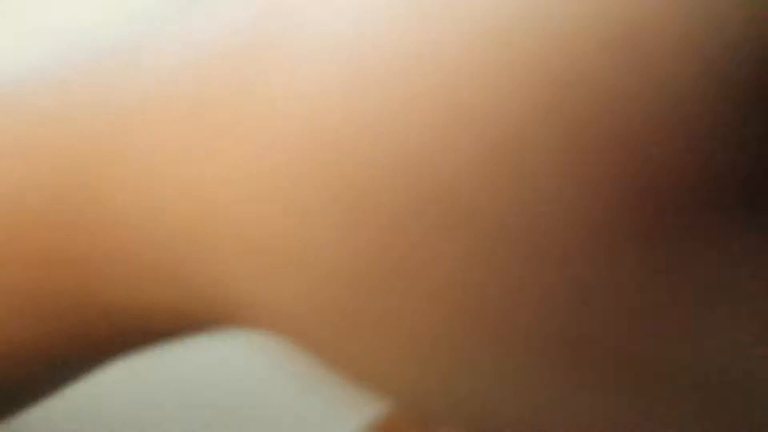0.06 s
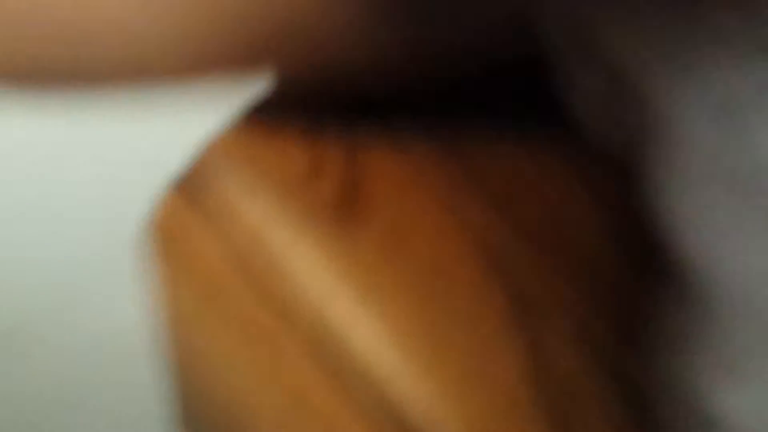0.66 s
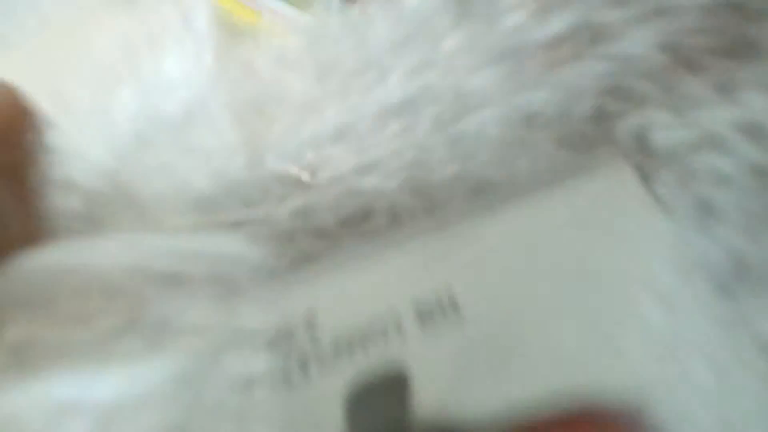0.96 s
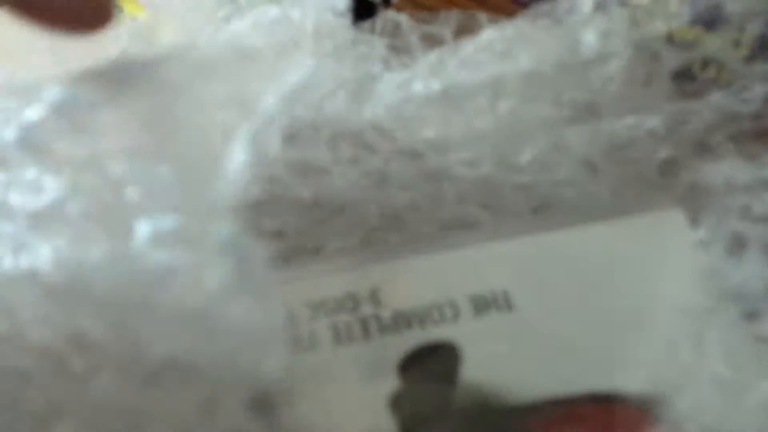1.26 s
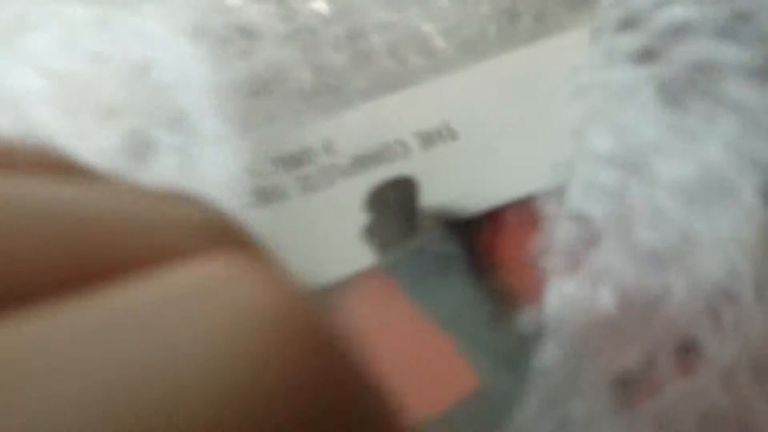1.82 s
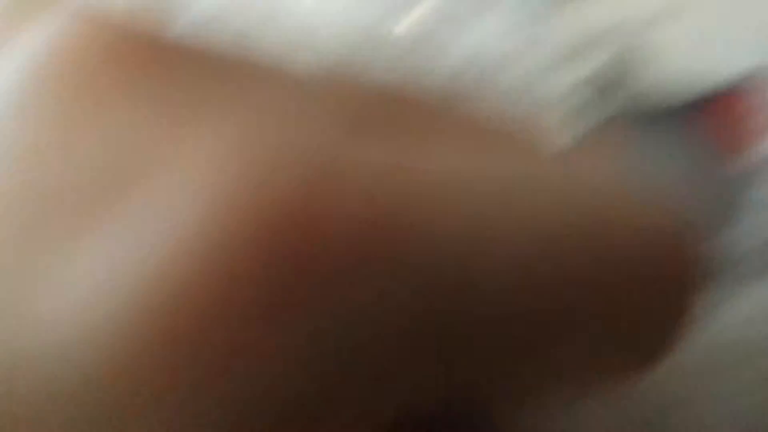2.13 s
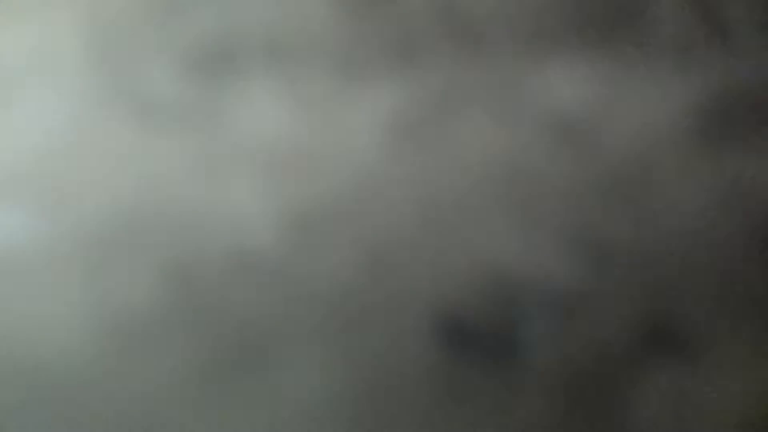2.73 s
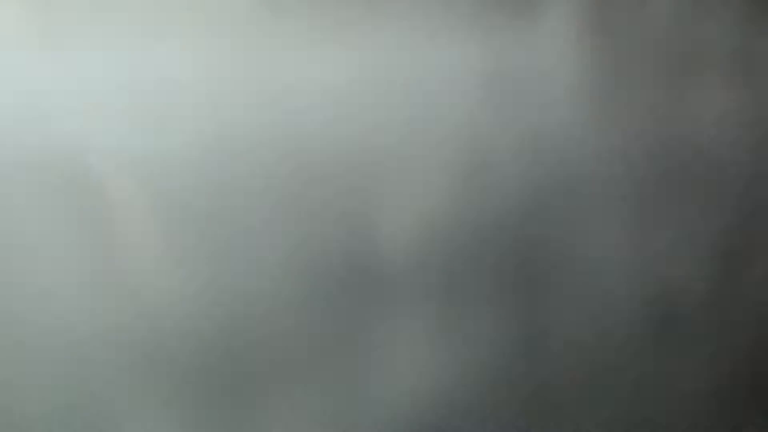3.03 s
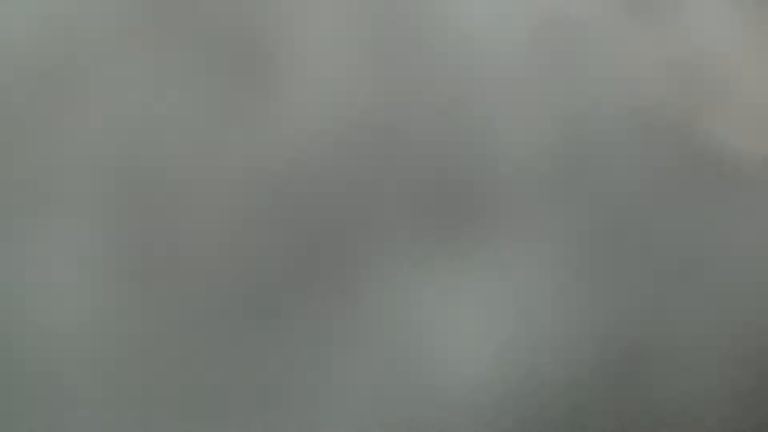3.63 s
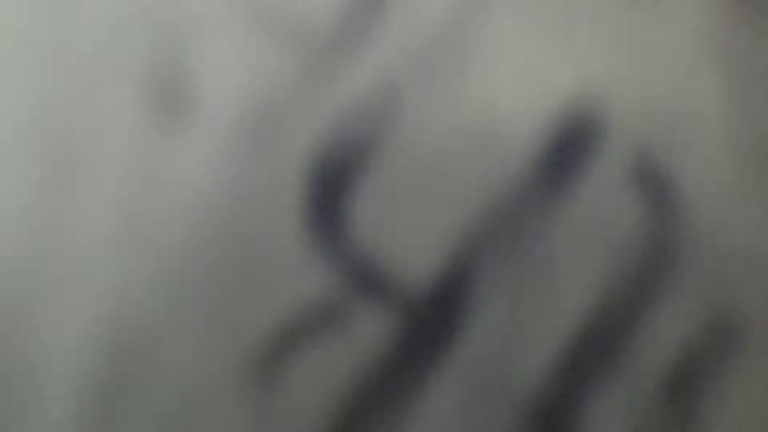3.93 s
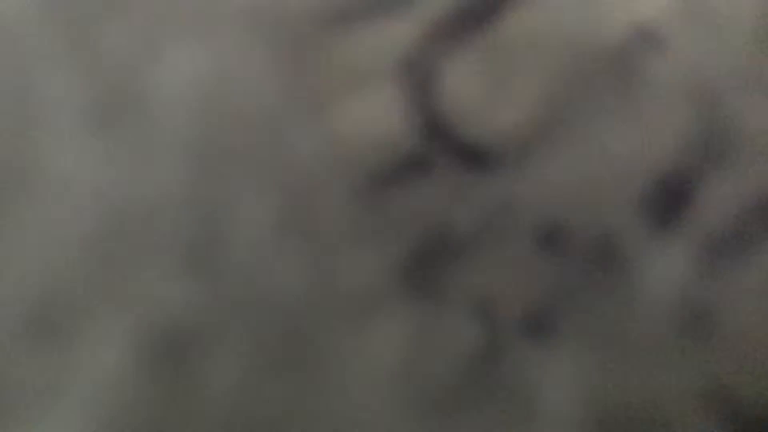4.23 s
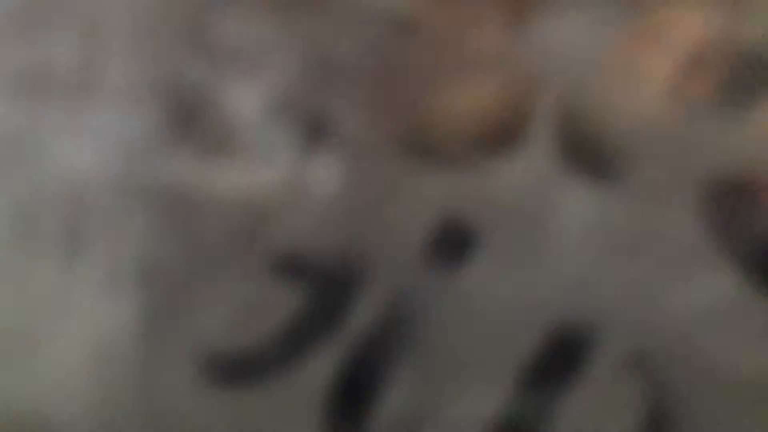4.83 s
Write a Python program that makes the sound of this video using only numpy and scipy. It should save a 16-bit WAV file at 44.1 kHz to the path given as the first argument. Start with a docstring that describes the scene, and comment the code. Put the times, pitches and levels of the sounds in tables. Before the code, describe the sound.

Plastic bubble wrap crackles and rustles very close as it is squeezed and tugged off a box indoors. A dense first burst of crinkling comes with low thumps and rumble from fingers on the microphone. After a short lull, irregular crinkles and crisp snaps carry on to the end, including a short finger squeak and a hiss of clinging plastic separating. The room sounds small and fairly dry.

```python
"""Bubble wrap pulled open by hand, right next to a handheld microphone in a small furnished room.
The film crinkles in a spray of tiny buckles; single creases snap and ring their air cells.
Fingers rub and knock on the housing. The wrap slides off its box, squeaks under a finger, peels apart.
Each of the two microphone ports colours the crackle with its own resonances."""
import sys
import numpy as np
from scipy import signal
from scipy.fft import rfft, irfft
from scipy.io import wavfile
from scipy.ndimage import uniform_filter1d

SR = 44100
rng = np.random.default_rng(int(sys.argv[2]) if len(sys.argv) > 2 else 0)


def generate_wav(signal):
    """Clip the signal to [-1, 1] and save it as 16-bit WAV at the path in sys.argv[1]."""
    frames = np.transpose(np.atleast_2d(signal))
    scaled = np.clip(frames, -1, 1) * 32767
    pcm = np.round(scaled).astype(np.int16)
    wavfile.write(sys.argv[1], SR, pcm)


N = 223675

# hands squeezing the film: start_s, rise_s, hold_s, level_db, body_re_level_db, pan_db (left - right)
FILM_SQUEEZES = [(0.0, 0.0033, 0.28, -46, 0.5, 17), (0.152, 0.098, 0.092, -21.5, -9.5, 6),
                 (0.357, 0.025, .03, -23.5, -10.5, 4.5), (0.454, 0.043, .12, -25.5, -10.5, 7),
                 (0.641, 0.027, 0.059, -26.5, -9.5, 5), (0.765, 0.049, 0.053, -22, -18.5, 5),
                 (0.892, 0.0084, 0.052, -38.5, -9.5, 2), (1.563, 0.076, 0.1, -40.5, -12.5, 0),
                 (1.885, 0.014, 0.23, -37, -19, 2), (1.967, 0.047, 0.038, -25.5, -37, 0.5),
                 (2.07, 0.13, 0.13, -30, -19, -2.5), (2.348, 0.0069, .008, -34.5, -5.5, -3),
                 (2.401, 0.0077, 0.14, -34.5, -9, 3), (2.558, 0.026, 0.029, -31.5, -10.5, 0),
                 (2.687, 0.041, 0.051, -31.5, -15.5, 2.5), (2.856, 0.087, 0.023, -33, -6, 1),
                 (2.972, .006, 0.021, -34.5, 3.5, 7), (3.039, 0.0079, .02, -36, 1, 5),
                 (3.128, 0.011, 0.005, -33.5, 1, 1), (3.27, 0.003, 0.073, -21.5, -17.5, 0.5),
                 (3.453, 0.015, .04, -37, -26, -4), (3.533, .006, 0.042, -19.5, -13.5, -1),
                 (3.593, 0.052, 0.11, -26, -17, -2), (3.831, 0.053, 0.14, -34.5, -14, -3.5),
                 (4.191, 0.0065, 0.012, -32, -10, -3.5), (4.352, 0.13, 0.02, -37, -9.5, -3.5),
                 (4.54, 0.061, 0.014, -35, -14.5, -5.5), (4.655, 0.009, 0.12, -38.5, -16.5, -6),
                 (4.794, 0.025, 0.22, -32.5, -14.5, -3.5), (4.863, 0.15, .10, -25, -17.5, -6.5)]
# loose film stirring: time_s, level_db
LOOSE_RUSTLE = [(0, -36.5), (0.95, -43), (1.0, -51), (1.05, -44.5), (1.27, -48), (1.36, -66), (1.56, -52.5),
                (2.0, -37.5), (3.1, -42), (3.45, -42.5), (3.82, -53.5), (4.1, -40.5), (4.33, -43.5),
                (5.07, -54)]
# big creases snapping: start_s, crack_db, cell_db, cell_hz, pan_db
BIG_CREASES = [(0.0236, -19, -46, 3420, 11), (0.069, -48, -11, 860, 24), (0.1267, -24.5, -30, 2000, 3),
               (0.2358, -12, -19, 3140, 14), (0.417, -15, -52, 3130, -12), (0.4581, -6.5, -11.5, 2040, 10),
               (0.486, -15.5, -30, 2500, 7), (0.527, -16, -15.5, 3100, 10), (0.572, -17, -20, 2300, 17),
               (0.6049, -19, -19.5, 2080, 19), (0.6393, -12.5, -21, 3200, 3.5),
               (0.6648, -14.5, -17, 2000, 7), (0.676, -19, -15, 1640, 15), (0.7467, -11, -7, 2520, 10),
               (0.7816, -18.5, -17, 2400, 21), (0.785, -24, -6.5, 2680, 11), (0.7956, -26, -15, 2200, 15),
               (0.8097, -17, -13.5, 1760, -10), (0.8117, -9.5, -9, 2000, 12), (0.832, -14, -23, 3100, 18),
               (0.8341, -17, -16, 2700, 5), (0.8841, -15, -43, 3200, 27), (0.9062, -11.5, -12, 2220, 11),
               (0.9101, -12.5, -13.5, 1810, 18), (1.276, -30.5, -51, 2260, 7.5), (1.961, -26, -21, 2700, 3),
               (2.0293, -15.5, -19, 3200, 4), (2.039, -19, -39, 2700, -11), (2.1516, -19.5, -45, 2900, 0),
               (2.1814, -18.5, -35, 2620, 0), (2.2201, -16, -52, 3200, 19), (2.2906, -15.5, -40, 2700, 3),
               (2.3235, -9, -10, 2300, -6), (2.3244, -10.5, -15, 1070, 6), (2.3711, -15.5, -18, 2200, -5),
               (2.478, -44, -19, 2140, 8), (2.5362, -26, -19, 1440, 34), (2.689, -21.5, -25.5, 2800, 12),
               (2.76, -21.5, -21, 2900, 4), (2.771, -23, -22, 1650, 32), (2.9556, -35, -13.5, 2350, 11),
               (3.0596, -25, -17.5, 1840, 0), (3.129, -22, -13.5, 2380, 1), (3.2003, -25, -46, 3300, -1),
               (3.2395, -14.5, -13, 2780, 14), (3.2687, -14.5, -16, 2240, 13), (3.2777, -25, -10, 2850, 3),
               (3.3012, -34, -17.5, 3000, 26), (3.3462, -15, -13, 2210, 7), (3.392, -24, -43, 3500, -20),
               (3.461, -23.5, -34, 3080, -2), (3.4744, -15, -22.5, 3100, -18), (3.4838, -23, -23, 2850, 9),
               (3.5081, -12.5, -20.5, 2690, -3), (3.5214, -23, -12.5, 1980, 6),
               (3.5417, -11.5, -11.5, 2730, 3), (3.6001, -20, -24, 2200, 13), (3.7309, -18, -26, 2770, 5),
               (3.9898, -21.5, -51, 2800, 31), (4.0884, -28.5, -34, 2320, -7), (4.1985, -19, -22, 3240, -9),
               (4.695, -20.5, -28.5, 2920, -4), (4.775, -30, -28.5, 2480, 3)]
# hand sliding on the housing: start_s, rise_s, hold_s, level_db, pan_db
HOUSING_RUBS = [(0.036, 0.038, .11, -31, -4), (0.153, 0.13, 0.095, -31, 14), (0.416, 0.013, 0.074, -45, 20),
                (0.704, 0.075, 0.05, -34, 12.5), (0.892, .01, 0.013, -36, 5), (1.88, 0.0075, 0.16, -56, 0),
                (2.43, 0.03, 0.095, -46.5, 18), (2.747, .01, 0.12, -54, 14), (2.954, .04, .18, -45, 11),
                (3.28, .07, .015, -41, 3), (3.53, 0.022, 0.023, -40, 3), (3.732, 0.019, 0.15, -52, -23),
                (4.574, 0.027, .01, -55, -14), (4.807, 0.019, 0.019, -48, -15)]
# soft knocks on the housing: start_s, level_db, pitch_hz
HOUSING_KNOCKS = [(0.042, -11.5, 65), (0.0689, -2.5, 82.6), (0.214, -11, 206), (0.339, -8.5, 162),
                  (0.701, -11, 186), (0.713, -11.5, 183), (0.744, -1, 307), (0.75, -8, 128.6),
                  (0.782, -9, 169), (0.810, -15, 171), (0.909, -16, 219), (1.199, -26, 507),
                  (2.21, -25, 426), (2.229, -19, 437), (2.534, -21, 378), (2.981, -5.5, 169),
                  (3.004, -10.5, 220), (3.050, -15, 132), (3.064, -10.5, 156), (3.136, -18, 139),
                  (3.958, -25.5, 303), (4.199, -15, 310), (4.249, -26.5, 285), (4.393, -24, 370),
                  (4.768, -13.5, 332)]
# wrap sliding off the box: time_s, level_db
SLIDE_CURVE = [(.92, -78), (.97, -46), (1.00, -55), (1.05, -45), (1.20, -60), (1.30, -64), (1.34, -82)]
# finger squeaking on the film: time_s, pitch_hz, level_db
SQUEAK_CURVE = [(1.965, 800, -86), (1.980, 926, -52), (2.000, 1020, -38), (2.014, 1040, -40),
                (2.030, 1150, -83)]
# clinging layers peeling apart: time_s, level_db
PEEL_CURVE = [(3.26, -78), (3.28, -57), (3.32, -40), (3.35, -30), (3.37, -62), (3.53, -60), (3.545, -23),
              (3.59, -60), (3.70, -61), (3.80, -77)]
# microphone port responses: freq_hz, gain_db
LEFT_PORT_EQ = [(100, -12), (1100, 9), (1600, -6), (2700, 4.5), (4200, -5), (5300, 0), (6300, 3.5),
                (7300, 0.5), (8400, -5), (10000, -26.5), (15000, -30)]
RIGHT_PORT_EQ = [(100, -19), (1100, -5), (1600, -21.5), (2700, -10), (3400, -13.5), (4600, -14), (6300, -8),
                 (7300, 1.5), (8400, -8.5), (10000, -13.5), (15000, -19.5)]
# housing rumble spectrum: freq_hz, density_db
RUMBLE_SPECTRUM = [(20, -37), (40, -19.5), (70, 5.5), (150, 5.5), (300, -4.5), (600, -17), (2000, -48.5)]


def from_db(db):
    """Decibels to gain."""
    return np.exp(np.asarray(db) * (np.log(10) / 20))


def power_db(power):
    """Power to decibels."""
    return 10 * np.log10(power + 1e-20)


def unit_rms(x):
    """Each channel scaled to rms 1."""
    return x / np.sqrt(np.mean(x ** 2, axis=-1, keepdims=True) + 1e-20)


def curves(rows):
    """Columns of a time table at every sample."""
    time_s, *columns = np.transpose(rows)
    return [np.interp(np.arange(N) / SR, time_s, column) for column in columns]


def pan(pan_db):
    """Left and right gains, mean power 1; positive is left."""
    gains = from_db(np.array([[.5], [-.5]]) * pan_db)
    return gains / np.sqrt(np.mean(gains ** 2, axis=0))


def butter(x, hz, kind, order=2):
    """Low-, high- or band-pass."""
    return signal.sosfilt(signal.butter(order, hz, kind, fs=SR, output="sos"), x + 1e-18)


def drift(rate_hz):
    """Random curve joining unit Gaussian knots."""
    knots = rng.standard_normal(N // 20)
    return np.interp(np.arange(N) / SR * rate_hz, np.arange(len(knots)), knots)


def impulse_response(spectrum, size=2048):
    """Minimum-phase response from freq_hz, gain_db points."""
    hz, db = np.transpose(spectrum)
    grid_hz = np.maximum(np.fft.rfftfreq(size, 1 / SR), 1)
    gain = from_db(np.interp(np.log(grid_hz), np.log(hz), db))
    cepstrum = irfft(np.log(gain))
    causal_fold = 1 + np.sign(size / 2 - np.arange(size))
    causal_fold[0] = 1
    return irfft(np.exp(rfft(cepstrum * causal_fold)))


def convolve(x, impulse):
    """Convolution cut to the input length."""
    return signal.fftconvolve(x, np.atleast_2d(impulse), axes=-1)[:, :x.shape[-1]]


def add(out, start_s, sound):
    """Mix in at start_s."""
    start = max(round(start_s * SR), 0)
    out[:, start:start + sound.shape[-1]] += sound[:, :max(N - start, 0)]


def gesture(rise_s, hold_s, release_db_per_s=271):
    """Gain of one hand movement: rise, hold, quick release."""
    t = np.arange(SR) / SR
    return np.minimum(t / rise_s, 1) * from_db(-release_db_per_s * np.maximum(t - rise_s - hold_s, 0))


def crushing(loose_body_db=-12.5, loose_pan_db=-0.5):
    """Squeezes plus loose rustle, as curves: level_db, body_re_level_db, pan_db."""
    loose = from_db(curves(LOOSE_RUSTLE))
    power = (loose * pan(loose_pan_db)) ** 2
    body_power = (loose * from_db(loose_body_db)) ** 2
    for start_s, rise_s, hold_s, db, body_db, pan_db in FILM_SQUEEZES:
        squeeze = from_db(db) * gesture(rise_s, hold_s)
        add(power, start_s, (squeeze * pan(pan_db)) ** 2)
        add(body_power, start_s, (squeeze * from_db([[body_db]])) ** 2)
    level_db = power_db(power.mean(axis=0))
    return level_db, power_db(body_power[0]) - level_db, power_db(power[0] / power[1])


def buckles(rate_hz, spread_db, pan_spread_db, decay_s):
    """Stereo power of a spray of tiny uneven bursts; mean near 1."""
    onsets = rng.random(N) < rate_hz / SR
    sizes_db = spread_db * np.minimum(rng.exponential(1, N), 4)
    power = (onsets * from_db(sizes_db) * pan(pan_spread_db * rng.standard_normal(N))) ** 2
    power = signal.lfilter([1], [1, -np.exp(-1 / (decay_s * SR))], power + 1e-12)
    return power / np.maximum(uniform_filter1d(power.mean(axis=0), 2500), 1e-12)


def shimmer(depth_db):
    """Stereo noise whose colour shifts from buckle to buckle."""
    noise = np.zeros((2, N))
    for band_hz in [1750, 4200], [4200, 9000], [9000, 20000]:
        noise += butter(rng.standard_normal((2, N)), band_hz, "band") * from_db(depth_db * drift(250))
    return unit_rms(noise)


def crinkle(ports, crush):
    """Harder crushing makes more buckles; each ticks brightly and shakes the sheet."""
    level_db, body_db, pan_db = crush
    rate_hz = 2300 * from_db(.12 * (level_db + 32) + 1.7 * drift(70))
    far = buckles(rate_hz, spread_db=1, pan_spread_db=11, decay_s=0.0011)
    # folds right at the housing tick sharply, mostly into one port
    near = buckles(rate_hz=330, spread_db=3.4, pan_spread_db=11, decay_s=0.00025)
    near_share = np.interp(level_db, [-46, -28], [.1, .38])
    spray = np.sqrt((1 - near_share) * far + near_share * near) * from_db(level_db + 0.87 * drift(71))
    ticks = unit_rms(convolve(shimmer(depth_db=3.5) * spray, ports))
    ticks *= np.sqrt(np.mean(spray ** 2)) * from_db(-0.41)
    body = rng.standard_normal((2, N)) * spray * from_db(body_db + 9.5 + 1.13 * drift(150))
    body = butter(butter(body, 287, "high"), 2450, "low", order=3)
    return ticks * pan(pan_db) + body * pan(pan_db + 6.5)


def lesser_creases(crush, rate_hz=18, spread_db=1.6, pan_spread_db=1.5, cell_hz=2710, count=200):
    """Random creases following the crush's level and pan; rows as in BIG_CREASES."""
    level_db, _, pan_db = crush
    draws = rng.standard_normal((count, 3))
    starts_s = np.cumsum(rng.exponential(1 / rate_hz, count))
    rows = []
    for start_s, (strength, hollowness, side) in zip(starts_s, draws):
        if start_s < N / SR:
            at = int(start_s * SR)
            db = level_db[at] + spread_db * strength
            crack_db, cell_db = db + 3, db - 6 + spread_db * hollowness
            rows.append((start_s, crack_db, cell_db, cell_hz, pan_db[at] + pan_spread_db * side))
    return rows


def snaps(ports, creases, attack_s=0.000098, crack_s=0.00067, flap_s=0.0012, decay_cycles=1.6, size=512):
    """A crease flips with a sharp crack; its air cell rings a few cycles."""
    out, t = np.zeros((2, N)), np.arange(size) / SR
    bright_ports = butter(ports[:, :size], 6450, "high")
    crack_envelope = np.exp(-t / crack_s) * (1 - np.exp(-t / attack_s))
    for start_s, crack_db, cell_db, cell_hz, pan_db in creases:
        burst, flap = rng.standard_normal((2, 2, size))
        crack = unit_rms(convolve(burst * crack_envelope, bright_ports))
        cell = np.sin(2 * np.pi * cell_hz * t) * np.exp(-t * cell_hz / decay_cycles)
        # the surrounding sheet flaps, duller for a bigger cell
        flap = butter(flap * np.exp(-t / flap_s), [330, min(1100 + 0.99 * cell_hz, 8000)], "band")
        ring = unit_rms(unit_rms(cell) + 1.2 * unit_rms(flap))
        add(out, start_s, from_db(crack_db + 0.34) * crack * pan(pan_db - 1.5))
        add(out, start_s, from_db(cell_db - 4.5) * ring * pan(pan_db + 4.5))
    return out * np.sqrt(100 / size)  # levels refer to a 100-sample burst


def rubbing(crush, lump_db=5.5, shake_db=-11.5, grip_db=-69.5):
    """Lumpy housing rumble from dragging skin, the resting grip and the sheet shaking the hand."""
    level_db, body_db, film_pan_db = crush
    shake = from_db(level_db + body_db + shake_db) * pan(film_pan_db + 5)
    power = shake ** 2 + from_db(grip_db) ** 2
    for start_s, rise_s, hold_s, db, pan_db in HOUSING_RUBS:
        add(power, start_s, (from_db(db) * gesture(rise_s, hold_s) * pan(pan_db)) ** 2)
    friction = rng.standard_normal((2, N)) * from_db(lump_db * drift(60))
    rumble = unit_rms(convolve(friction, impulse_response(RUMBLE_SPECTRUM)))
    return rumble * np.sqrt(power)


def knocks(attack_s=0.00067, t60_cycles=4.1, scuff_db=-7.5, sag=0.53, pan_db=24.5, size=8192):
    """A finger by the left port scuffs the housing and sets it swinging; pitch sags on release."""
    out, t = np.zeros((2, N)), np.arange(size) / SR
    for start_s, level_db, pitch_hz in HOUSING_KNOCKS:
        t60_s = t60_cycles / pitch_hz
        scuff = unit_rms(butter(rng.standard_normal((2, size)), pitch_hz + 180, "low", order=3))
        glide_hz = pitch_hz * (1 + sag * (.25 - np.minimum(t / t60_s, 1)))
        swing = np.sin(2 * np.pi * np.cumsum(glide_hz) / SR)
        envelope = from_db(level_db - 60 * t / t60_s) * (1 - np.exp(-t / attack_s))
        add(out, start_s, (swing + from_db(scuff_db) * scuff) * envelope * pan(pan_db))
    return out


def sliding(centre_hz=2700, q=4, pan_db=21):
    """Film gliding over cardboard swishes in one broad resonance."""
    level_db, = curves(SLIDE_CURVE)
    swish = signal.lfilter(*signal.iirpeak(centre_hz, q, fs=SR), rng.standard_normal((2, N)))
    return unit_rms(butter(swish, 2000, "high")) * from_db(level_db + 1.5 * drift(41)) * pan(pan_db)


def squeak(jitter=0.15, flutter_db=4.8, pan_db=4):
    """Skin sticks and slips on the film: a short, rough, rising tone."""
    t = np.arange(N) / SR
    pitch_hz, level_db = curves(SQUEAK_CURVE)
    phase = 2 * np.pi * np.cumsum(pitch_hz * (1 + jitter * drift(540))) / SR
    gate = (t > SQUEAK_CURVE[0][0]) & (t < SQUEAK_CURVE[-1][0])
    return np.sin(phase) * gate * from_db(level_db + flutter_db * drift(200)) * pan(pan_db)


def peeling(band_hz=(9500, 15000), pan_db=-19.5):
    """Tiny contacts let go one after another in a very bright sizzle."""
    level_db, = curves(PEEL_CURVE)
    spray = np.sqrt(buckles(rate_hz=2200, spread_db=7, pan_spread_db=-23, decay_s=0.00034))
    sizzle = unit_rms(butter(rng.standard_normal((2, N)) * spray, band_hz, "band"))
    return sizzle * from_db(level_db + 4.5) * pan(pan_db)


def room(x, t60_s=0.26, level_db=-22, predelay_s=0.004, size=16384):
    """Short diffuse tail, different at each port."""
    t = np.arange(size) / SR
    tail = rng.standard_normal((2, size)) * from_db(-60 * t / t60_s) * (t > predelay_s)
    tail = unit_rms(butter(tail, 6800, "low", order=1)) / np.sqrt(size)
    return from_db(level_db) * convolve(x, tail)


def scene():
    """Film crackles in the room; handling noise goes straight to the ports."""
    ports = np.array([impulse_response(LEFT_PORT_EQ), impulse_response(RIGHT_PORT_EQ)])
    crush = crushing()
    housing = from_db(-3) * knocks() + rubbing(crush)
    film = crinkle(ports, crush) + sliding() + peeling() + squeak()
    film += snaps(ports, list(BIG_CREASES) + lesser_creases(crush))
    return film + room(film) + butter(housing, 45, "high")


def record(dry, cutoff_hz=15900):
    """The loudest snaps clip; a steep low-pass follows."""
    lowpass = signal.ellip(10, .1, 80, cutoff_hz, fs=SR, output="sos")
    return signal.sosfilt(lowpass, np.clip(dry, -1, 1))


dry = scene()
out = record(dry)
generate_wav(out)
```